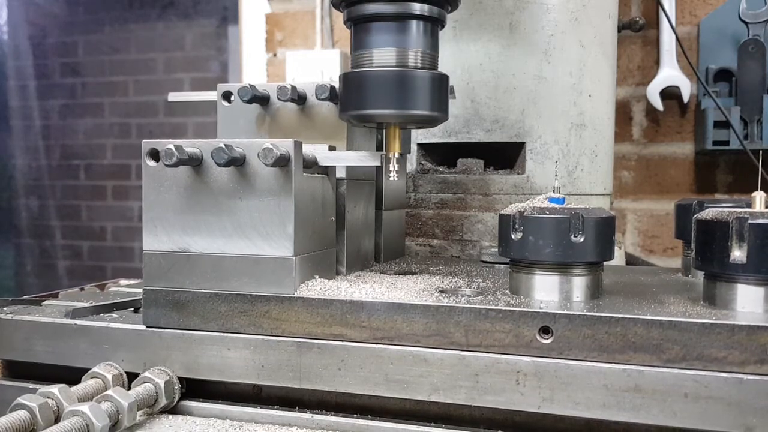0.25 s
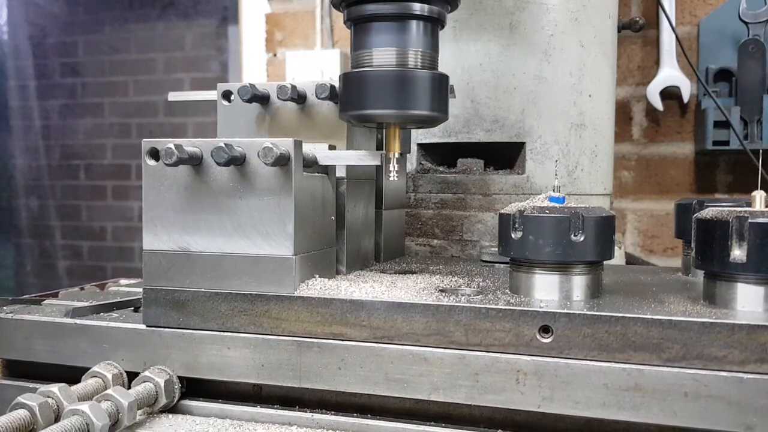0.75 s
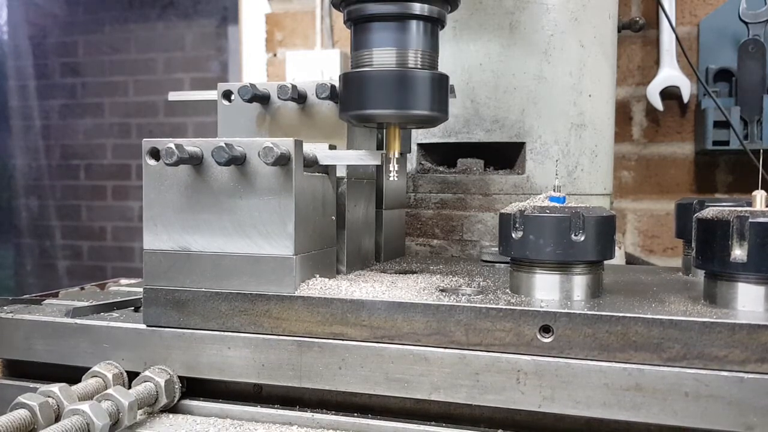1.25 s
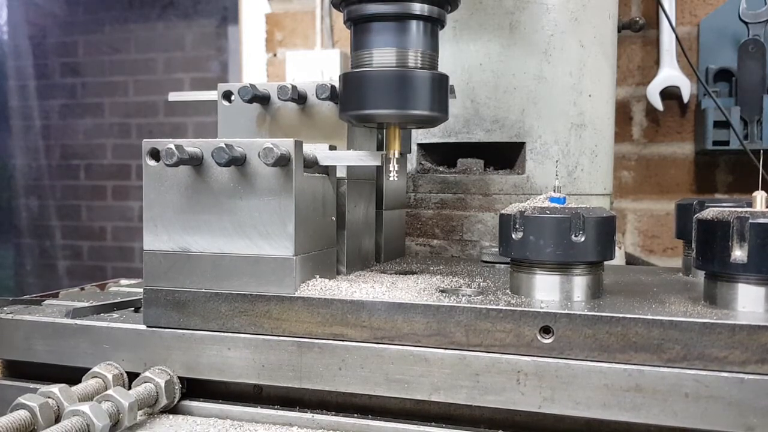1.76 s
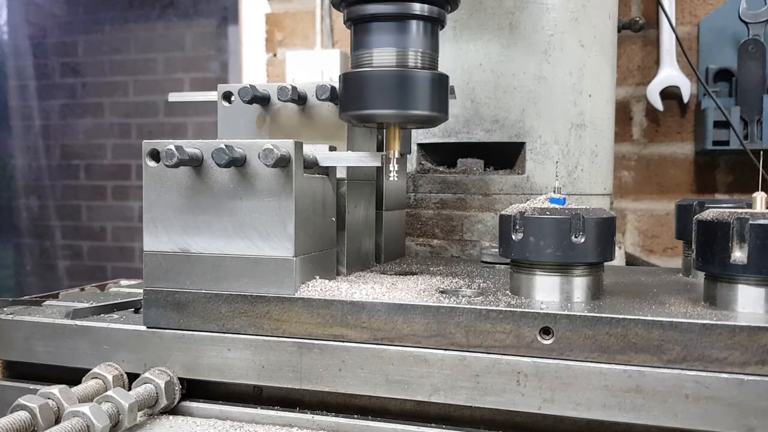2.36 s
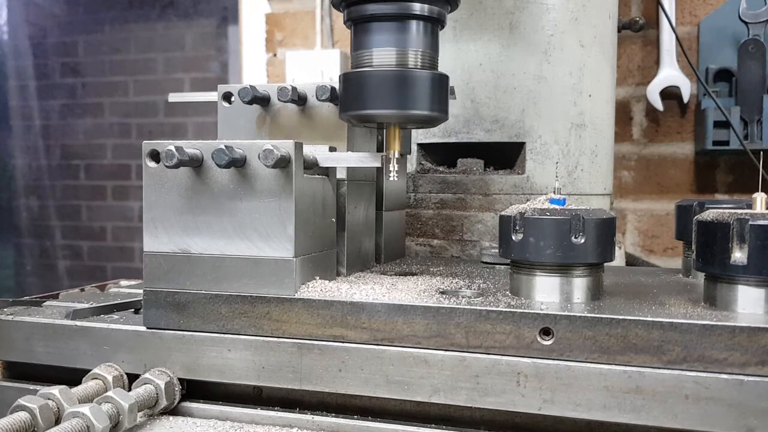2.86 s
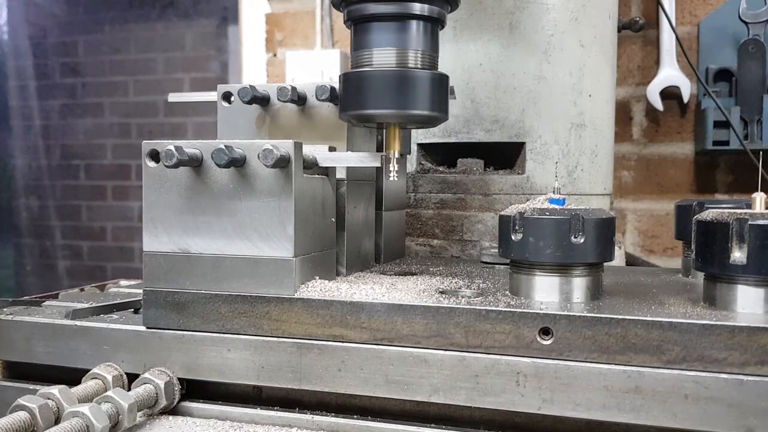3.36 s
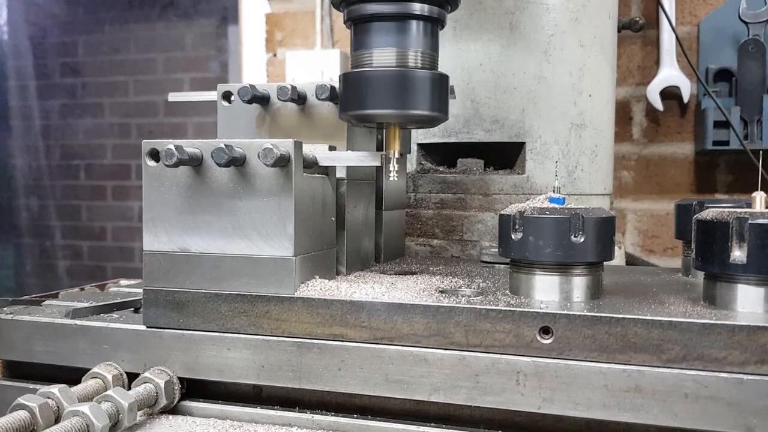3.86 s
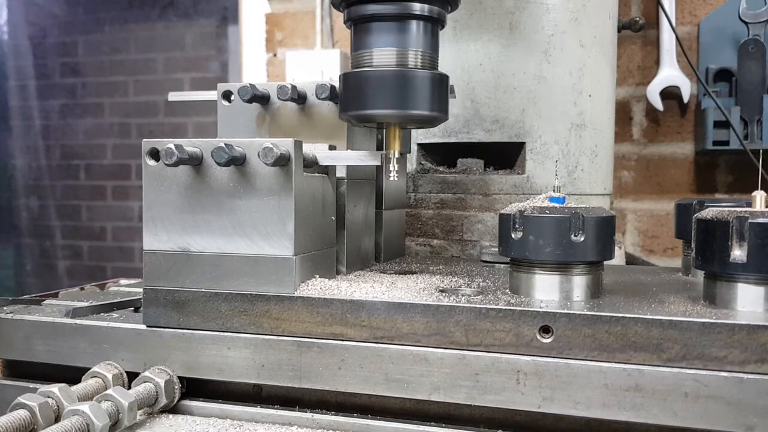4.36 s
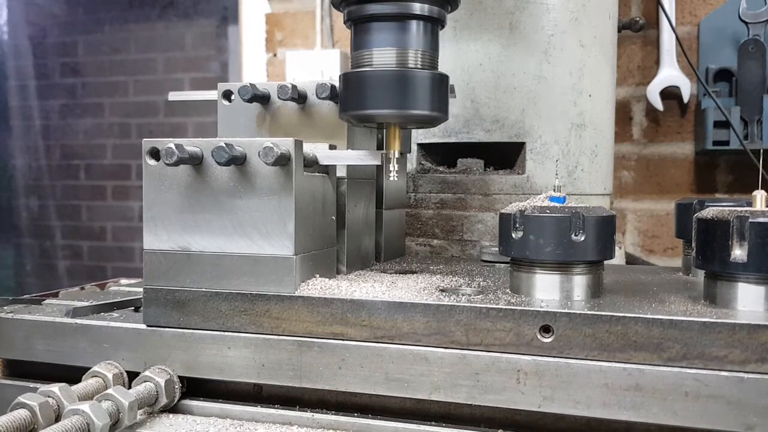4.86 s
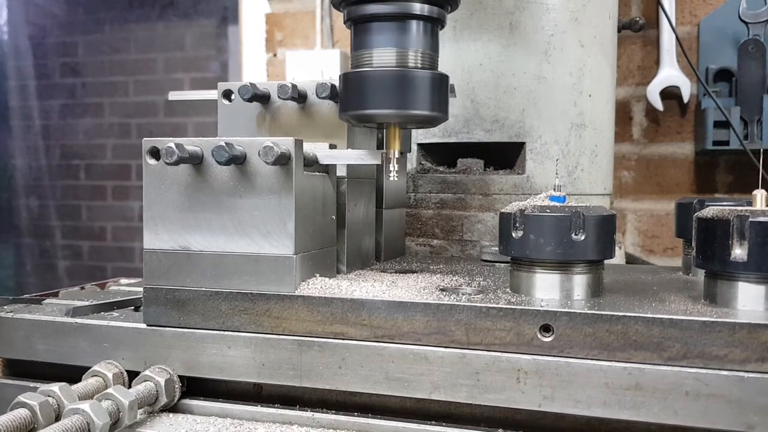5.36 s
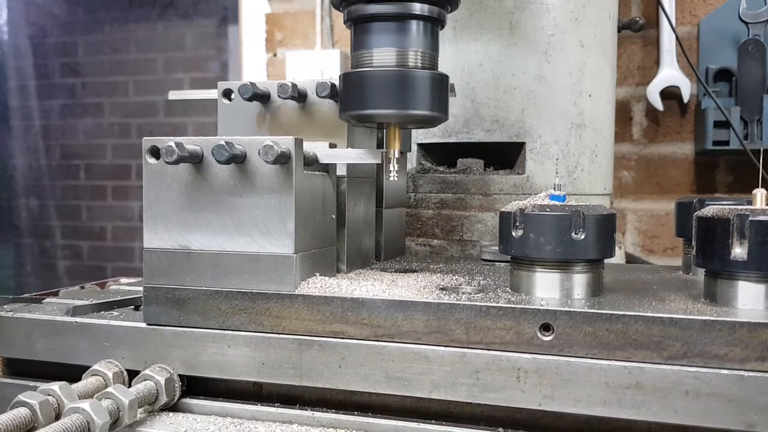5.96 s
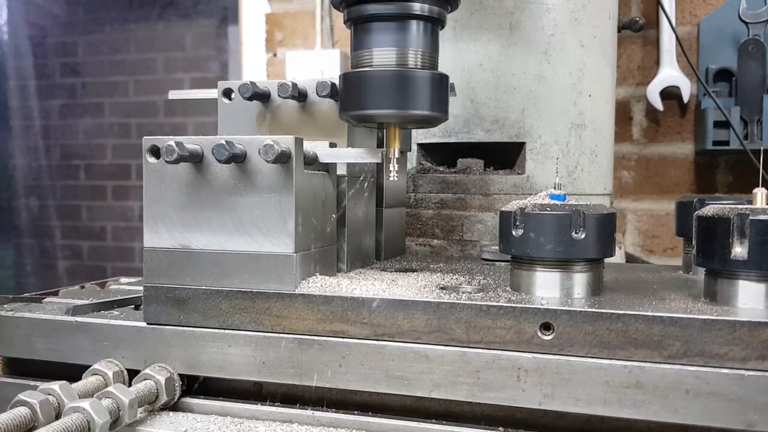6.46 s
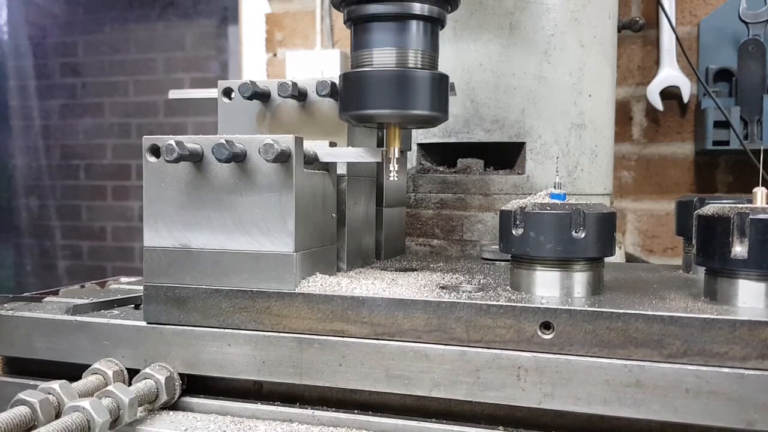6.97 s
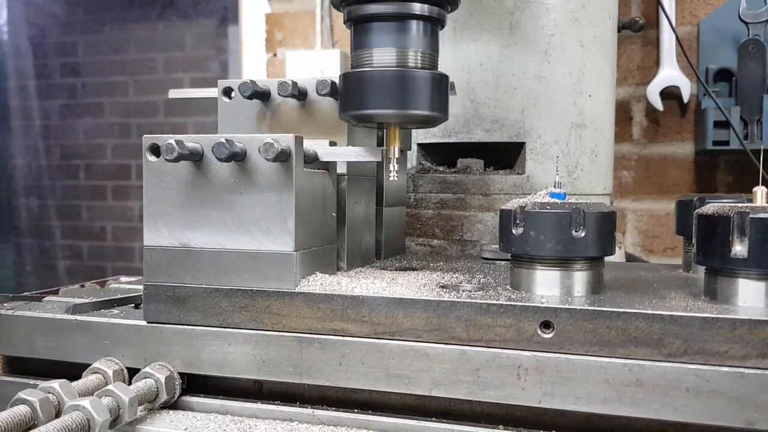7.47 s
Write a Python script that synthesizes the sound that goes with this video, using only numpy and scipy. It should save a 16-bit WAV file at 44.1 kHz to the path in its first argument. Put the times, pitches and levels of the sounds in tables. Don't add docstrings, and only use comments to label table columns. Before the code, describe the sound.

Constant low motor and gear drone with airy fan hiss, broken by two passes of shrill metal squeal, scratchy chip hiss and brief rattling chatter.

```python
import sys
import numpy as np
from scipy import signal
from scipy.fft import rfft, irfft, next_fast_len
from scipy.io import wavfile
from scipy.ndimage import uniform_filter1d, map_coordinates

SR = 44100
rng = np.random.default_rng(int(sys.argv[2]) if len(sys.argv) > 2 else 0)


def wav_out(sig):
    wavfile.write(sys.argv[1], SR, np.round(np.clip(np.atleast_2d(sig).T, -1, 1) * 32767).astype(np.int16))


def convert_level_to_amplitude(level_db):
    exponent = np.asarray(level_db, float) / 20
    return 10 ** exponent


N = 340442
T = np.arange(N) / SR

SHAFT_HZ, BELT_HZ, SPINDLE_HZ = 12.4138, 5.4382, 28.4
# order, level_db, left_right_db, left_lead_rad
SHAFT_ORDERS = [(5, -59.0, 2.0, -0.0), (6, -58.0, 2.0, -0.0), (7, -61.0, 0.0, -0.2), (8, -50.0, -4.0, 0.2),
                (11, -65.0, -7.0, 0.6), (14, -59.0, 5.0, 0.1), (16, -61.0, 1.0, 0.0), (18, -37.0, 3.0, 0.0),
                (19, -51.0, 3.0, 0.1), (20, -41.0, 2.0, -0.1), (21, -51.0, 2.0, 0.2), (22, -44.0, 1.0, 0.0),
                (23, -59.0, 2.0, 0.1), (24, -48.0, 3.0, -0.1), (25, -62.0, 2.0, -0.2),
                (27, -61.0, 3.0, 0.2), (28, -60.0, 3.0, -0.0), (29, -62.0, 1.0, 0.2), (32, -59.0, 0.0, 0.2),
                (33, -62.0, 3.0, 0.5), (38, -52.0, 3.0, 0.2), (46, -54.0, 2.0, -0.7), (51, -62.0, 5.0, 0.4),
                (53, -61.0, 5.0, -0.0)]
# order, level_db, left_right_db, left_lead_rad
GEAR_ORDERS = [(79, -68.0, 1.0, 0.5), (97, -58.0, 0.0, -0.7), (101, -55.0, 5.0, 0.0),
               (103, -56.0, -1.0, 0.7), (104, -58.0, 1.0, 1.3), (106, -56.0, -1.0, -0.8),
               (108, -57.0, -5.0, -1.2), (109, -54.0, -6.0, -0.1), (110, -56.0, -1.0, -0.2),
               (111, -53.0, -2.0, 1.2), (112, -52.0, 0.0, -0.6), (113, -52.0, -7.0, 2.8),
               (114, -44.0, 19.0, 2.2), (116, -43.0, 1.0, -0.9), (120, -61.0, -2.0, -2.1),
               (121, -61.0, -2.0, 2.1), (126, -64.0, -5.0, 1.0), (129, -60.0, -5.0, 1.9),
               (141, -64.0, -3.0, 1.0), (175, -55.0, 15.0, 2.3), (184, -61.0, 7.0, 2.7),
               (195, -63.0, 1.0, 1.9), (198, -65.0, 2.0, 1.0), (206, -64.0, 0.0, 1.1),
               (212, -59.0, 2.0, -0.0), (215, -59.0, -4.0, -0.9), (223, -56.0, 8.0, 0.6),
               (224, -61.0, 5.0, 0.2), (227, -65.0, 4.0, 0.1), (236, -65.0, -1.0, 1.6)]
# order, level_db, left_right_db, left_lead_rad
BELT_ORDERS = [(8, -70.0, 0.0, 0.3), (11, -65.0, 2.0, -0.0), (12, -60.0, 3.0, -0.0), (13, -55.0, 2.0, 0.0),
               (15, -63.0, 3.0, -0.0), (17, -63.0, -1.0, -0.0), (20, -64.0, -2.0, -0.1),
               (26, -62.0, 3.0, 0.3), (27, -63.0, 2.0, 0.2), (28, -52.0, 2.0, 0.0), (29, -60.0, 2.0, 0.1),
               (30, -58.0, 1.0, -0.2), (31, -61.0, 1.0, 0.1), (34, -60.0, 1.0, 0.1), (38, -54.0, 3.0, -0.1),
               (39, -49.0, 3.0, -0.0), (40, -50.0, 3.0, -0.1), (42, -44.0, 3.0, 0.0),
               (59, -58.0, 2.0, -0.1), (61, -55.0, 4.0, -0.1), (63, -61.0, 3.0, -0.0),
               (84, -58.0, 5.0, -0.5), (106, -55.0, 10.0, -0.9), (109, -62.0, 0.0, 0.0)]
# line_hz, level_db, left_right_db, left_lead_rad
INVERTER_LINES = [(5846.0, -67.0, -3.0, -2.3), (5963.4, -63.0, -7.0, 0.5), (5994.6, -51.0, 6.0, 1.2),
                  (6026.1, -61.0, -12.0, 1.4), (6041.0, -63.0, -8.0, -2.6), (6143.7, -64.0, 0.0, -1.4),
                  (7507.5, -65.0, 11.0, 0.4), (8945.3, -70.0, -7.0, -1.0), (11782.5, -75.0, 5.0, 1.7),
                  (11896.1, -74.0, 9.0, 2.9), (11958.3, -58.0, 1.0, -0.4), (11974.7, -67.0, 9.0, -2.1),
                  (11989.7, -64.0, 5.0, -0.2), (12020.6, -65.0, 3.0, 2.7), (12083.3, -68.0, 1.0, -2.9),
                  (12259.0, -73.0, 9.0, -2.6), (14940.3, -69.0, 2.0, 2.5), (14971.2, -71.0, 0.0, 0.2),
                  (15002.4, -70.0, -3.0, -1.4), (15014.6, -57.0, 21.0, -0.6), (15033.7, -63.0, -5.0, 2.0)]
# freq_hz, density_db_per_hz
RUMBLE = [(21, -53), (35, -26), (80, -15), (168, -13), (235, -8), (378, -11), (470, -11), (699, -15),
          (852, -9.5), (1040, -20), (1400, -10), (1740, -17.5), (2120, -12.5), (2440, -20.5), (4000, -23),
          (5200, -10), (8800, -120)]
# freq_hz, density_db_per_hz
FAN_HISS = [(1470, -36), (2500, -6.5), (2700, -6.5), (3570, -8), (3890, -10), (5270, -6), (6150, -8),
            (6300, -8.5), (7950, -16.5), (10600, -19.5), (11700, -14), (14100, -23.5), (15400, -13),
            (16000, -54)]
# freq_hz, width_hz, level_db
CASTING_MODES = [(225.6, 18, -49), (508, 73, -51), (892, 51, -57), (1244, 250, -46.5), (1607, 32, -52.5),
                 (2136, 23, -52), (3933, 130, -54.5)]
# freq_hz, level_db
BALL_TONES = [(155.7, -58), (657.6, -57), (717.5, -59), (781, -56), (829, -58), (842.5, -52), (871.4, -58),
              (1196.5, -57), (1617, -54), (1885, -61), (2024, -61), (2129, -55), (2153, -56), (2287, -57),
              (2555, -60), (2982, -61), (3013, -61), (3075, -61)]
# freq_hz, left_right_likeness
LIKENESS = [(60, 0.96), (130, 0.85), (290, 1), (640, 0.99), (1410, 0.14), (3100, 0.048), (6820, 0.026),
            (15000, 0.061)]
# freq_hz, left_right_db
NOISE_LEAN = [(60, 2), (130, 1.5), (290, -1), (640, 5.5), (1410, 1.5), (3100, 1), (6820, 0.5), (15000, 10)]
MACHINE_DB = 1.5

# start_s, level_db, rise_s, hold_s, fall_s
CHIP_SWELLS = [
    (1.2, -53, 0.37, 0.43, .1),
    (1.215, -45, .04, .05, .05),
    (1.285, -36, 0.03, 0.046, 0.14),
    (2.8, -58, .2, .03, .04),
    (5.0, -46.5, .06, 1.23, .1),
    (6.39, -36, 0.15, .11, 0.18),
    (6.5, -42.5, .1, 1.18, 0.11),
    (6.8, -42, .1, .02, .1),
]
RUB_HZ = 13110
# start_s, depth_db, attack_s, let_go_s, release_s
GAIN_DUCKS = [
    (1.24, 5, 0.64, 4.04, 0.62),
    (6.88, 3, 0.037, 8, .6),
]

# time_s, pitch_hz
SQUEAL_PITCH = [(1.25, 4590), (1.38, 4578), (1.56, 4596), (1.685, 4610), (1.705, 4598), (1.76, 4592),
                (1.79, 4580), (1.92, 4566), (2.0, 4580), (4.97, 4591), (5.3, 4597), (6.37, 4597),
                (6.43, 4606), (6.55, 4584), (6.64, 4591), (6.84, 4585), (6.95, 4592), (7.72, 4593)]
# start_s, level_db, rise_s, hold_s, fall_s
UPPER_SWELLS = [(1.252, -40, .01, .01, .02), (1.29, -36, .03, .02, .02), (1.335, -29, .03, .08, .3),
                (1.54, -25, .13, .08, .15), (1.64, -27, .05, .058, .02), (1.72, -31, .02, .04, .05),
                (1.79, -30, .05, .005, .12), (1.92, -43, .1, .05, .15), (5.0, -41, .04, .09, .1),
                (5.1, -38, .06, .45, .04), (5.6, -47, .04, .77, .1), (6.41, -36.5, .03, .15, .2),
                (6.64, -35.5, .15, .06, .03), (6.72, -44, .02, .02, .04), (6.79, -37.5, .025, .04, .1),
                (6.9, -44, .05, .11, .05), (7.0, -48, .1, .25, 1.5)]
# start_s, level_db, rise_s, hold_s, fall_s
LOWER_SWELLS = [(1.31, -24.5, .025, .02, .2), (1.4, -36, .1, .1, .3), (1.71, -27, .015, .05, .14),
                (1.85, -33, .1, .02, .2), (2.05, -51, .1, .05, .12), (5.0, -39, .04, .02, .1),
                (5.025, -35.5, .04, .04, .55), (6.45, -40, .08, .2, .2), (6.68, -36, .15, .02, .1),
                (6.728, -34.5, .02, .02, .08), (6.78, -38.5, .03, .05, .1), (6.885, -22.5, .11, .065, .055),
                (7.0, -41, .05, .3, .1), (7.33, -37, .3, .27, .7)]
# time_s, gap_hz
LINE_GAP = [(4.9, 28.4), (4.91, 26.3), (5.22, 26.3), (5.24, 28.4), (5.6, 28.4), (6.0, 29), (6.42, 28.4),
            (6.5, 23), (6.7, 22.2), (6.72, 14), (6.77, 14), (6.785, 28), (6.95, 28.4)]
# time_s, level_db
SECOND_HARMONIC = [(1.28, -30), (1.3, -15), (1.42, -14), (1.56, -27), (1.61, -23), (1.68, -15), (1.7, -24),
                   (4, -23)]
# start_s, level_db, rise_s, hold_s, fall_s
TIP_SINGS_SWELLS = [
    (1.42, -51, .03, 0.11, .1),
    (1.62, -30.5, 0.18, 0.077, 0.32),
]
THIRD_DB = -24
SECOND_PASS_S = 4
LOWER_LAG_TURNS = (.47, .8)

# start_s, level_db, rise_s, hold_s, fall_s
CHATTER_SWELLS = [
    (1.702, -20, 0.012, 0.16, 0.22),
    (2.07, -34, 0.11, 0.064, 0.13),
    (2.2, -44, .1, 0.21, .06),
]
# time_s, peak_db, ring_hz, half_length_s
EDGE_BITES = [
    (1.305, -11, 13700, 0.0022),
    (1.313, -21, 13600, .002),
    (1.691, -15, 13550, .0025),
    (1.989, -19, 13450, .002),
]
# time_s, peak_db
SHANK_RAPS = [(1.8223, -24), (1.8652, -27), (1.9155, -23), (1.951, -35), (1.9684, -26), (1.9869, -22),
              (2.0602, -28), (2.0697, -23), (2.1306, -27), (2.1695, -36), (2.2867, -34), (2.3221, -36),
              (2.4009, -37)]
# time_s, peak_db
CHIP_SNAGS = [
    (1.9165, -15),
    (2.0283, -26),
    (2.0567, -23),
    (2.0862, -27),
    (2.0981, -25),
    (2.2029, -34),
    (2.2777, -34),
    (2.3087, -30),
    (2.368, -34),
]
RAP_HALF_S, SNAG_HALF_S, RAP_DB, SNAG_DB = 0.0038, .003, -3.5, -1
TIP_HZ, TIP_SAG_HZ_PER_S = 13590, 400
RATTLE_HZ, RATTLE_SAG_HZ_PER_S = 4520, 160
RATTLE_DB, RATTLE_GROWS = -20.5, 0.6
SHANK_LOW_HZ, SHANK_LOW_DB = 4280, -7
DIG_S, DIG_DB, DIG_HALF_S = 1.303, -33, .002

# tip_level_db, from_hz, to_hz
EMPTIED_BANDS = [
    (-34, 15250, 16500),
    (-29, 14450, 15250),
    (-28.5, 10300, 11700),
    (-24.5, 9700, 12300),
]


def unit(x):
    return x / np.sqrt(np.mean(np.abs(x) ** 2) + 1e-20)


def along(points, hz):
    f, v = np.transpose(points)
    return np.interp(np.log(hz + 1), np.log(f + 1), v)


def wobble(rate_hz):
    return map_coordinates(rng.standard_normal(int(N * rate_hz / SR) + 4), [T * rate_hz])


def swells(rows):
    def under(start_s, rise_s, hold_s, fall_s):
        before = (start_s - T) / abs(rise_s)
        after = (T - start_s - hold_s) / abs(fall_s)
        return np.maximum(np.maximum(before, after), 0)

    power = sum(convert_level_to_amplitude(db - 20 * np.minimum(under(s, *shape), 10)) ** 2 for s, db, *shape in rows)
    return np.sqrt(power)


def filtered(x, response):
    m = next_fast_len(N + 8192)
    return irfft(rfft(x, m) * response(np.fft.rfftfreq(m, 1 / SR)), m)[..., :N]


def ears(pan_db, lead_rad):
    side = np.array([.5, -.5])[:, None]
    level = convert_level_to_amplitude(side * pan_db) / np.sqrt(np.cosh(pan_db * np.log(10) / 20))
    return level * np.exp(1j * side * lead_rad)


def turning(orders, turns, angle, scatter, bend=0, size=16384):
    k, db, pan_db, lead_rad = np.transpose(orders)
    phase = -2 * np.pi * k * angle + scatter * rng.standard_normal(len(k))
    phase = phase + 2 * np.pi * bend * (k - k[np.argmax(db)]) ** 2
    phase = phase - np.angle(ears(pan_db, lead_rad).sum(0))
    lines = np.zeros((2, size // 2 + 1), complex)
    lines[:, np.round(k).astype(int)] = convert_level_to_amplitude(db) * np.exp(1j * phase) * ears(pan_db, lead_rad)
    table = irfft(lines, size) * size / np.sqrt(2)
    return np.array([np.interp(turns % 1 * size, np.arange(size), side, period=size) for side in table])


def rush(gain):
    def mid_side(hz):
        turn = np.arccos(np.clip(along(LIKENESS, hz), 0, 1)) / 2
        return gain(hz) * [np.cos(turn), np.sin(turn)]

    mid, side = filtered(rng.standard_normal((2, N)), mid_side)
    lean = lambda hz: convert_level_to_amplitude(np.outer([.5, -.5], along(NOISE_LEAN, hz)))
    return unit(filtered(np.array([mid + side, mid - side]), lean))


def narrow(hz, width_hz, lump_db):
    base = filtered(rng.standard_normal((2, N)), lambda f: 1 / (1 + (2 * f / width_hz) ** 4))
    lumps = convert_level_to_amplitude(lump_db * wobble(140))
    carrier = np.exp(2j * np.pi * np.cumsum(hz) / SR)
    return unit(lumps * (base[0] + 1j * base[1])) * np.sqrt(2) * carrier


def drive():
    shaft = SHAFT_HZ * T + .0016 * wobble(2.5) + .0002 * wobble(14)
    hum = turning(SHAFT_ORDERS, shaft, angle=.86, scatter=.15, bend=.054)

    beat = 18 * (shaft - .36) - (18 * SHAFT_HZ - 41 * BELT_HZ) * (T - .28)
    partner = -convert_level_to_amplitude(-41.5 + np.array([[4.5], [1.5]])) * np.cos(2 * np.pi * beat)

    mesh_scatter = np.where(abs(np.transpose(GEAR_ORDERS)[0] - 112) < 5, .15, 3)
    mesh = turning(GEAR_ORDERS, shaft, angle=.455, scatter=mesh_scatter)
    mesh = mesh * convert_level_to_amplitude(.7 * wobble(6) + .5)

    k = np.arange(30, 300)
    faint_db = along(RUMBLE, k * SHAFT_HZ) + rng.normal(-50.5, 3.1, len(k))
    strong = np.isin(k, np.transpose(SHAFT_ORDERS + GEAR_ORDERS)[0])
    faint_db = np.where(strong, -120, faint_db)
    faint = [k, faint_db, rng.normal(2.4, 4.0, len(k)), rng.normal(0, 1.84, len(k))]
    small = turning(np.transpose(faint), shaft, angle=0, scatter=3.6)

    belt = turning(BELT_ORDERS, BELT_HZ * T + 0.00029 * wobble(2.58), angle=0, scatter=5.09)
    return hum + partner + mesh + small + belt


def inverter():
    span_s = N / SR
    cycles = np.multiply(INVERTER_LINES, [span_s, 1, 1, 1])
    return turning(cycles, T / span_s, angle=0, scatter=3.53, size=N)


def bearings():
    body = convert_level_to_amplitude(-38) * rush(lambda hz: convert_level_to_amplitude(along(RUMBLE, hz)) * (hz < 4600))
    air = convert_level_to_amplitude(-42.0 + 0.96 * wobble(16)) * rush(lambda hz: convert_level_to_amplitude(along(FAN_HISS, hz)))

    def casting(f):
        return sum(convert_level_to_amplitude(db) * np.sqrt(100 / w) / (1 + (2 * (f - hz) / w) ** 2) for hz, w, db in CASTING_MODES)

    def head_modes(f):
        return 1 / (1 + (2 * (f - 2740) / 240) ** 2) + .45 / (1 + (2 * (f - 3930) / 200) ** 2)

    knock = unit(np.exp(2.5 * np.cos(2 * np.pi * (SHAFT_HZ * T - .62))))
    head = convert_level_to_amplitude(-47) * knock * rush(head_modes)
    air = air * (1 + .03 * knock)
    return body + air + head + convert_level_to_amplitude(-41.5) * rush(casting)


def balls():
    out = 0
    for hz, db in BALL_TONES:
        level = convert_level_to_amplitude(db + 1.5 + 1.5 * wobble(4))
        tone = level * np.exp(2j * np.pi * hz * T + 1j * hz / 1800 * wobble(5))
        out = out + tone * ears(rng.normal(2, 3), rng.normal(0, hz / 2000))
    return out.real


def chips():
    hz = np.full(N, RUB_HZ)
    throb = 1 + .3 * np.cos(2 * np.pi * (SPINDLE_HZ * T + .1 * wobble(3)))
    tip = narrow(hz, width_hz=320, lump_db=1.5) * ears(5.4, -1.2)
    tip = tip + 0.91 * narrow(hz + 350, width_hz=870, lump_db=0.0) * ears(4.5, -.6)
    spray = convert_level_to_amplitude(-5.5) * rush(lambda f: f / (f + 6000))
    graze = 1 + .8 * np.cos(2 * np.pi * SPINDLE_HZ * (T - 1.286))
    throb = throb * np.where(T < 1.3, graze, 1)
    return swells(CHIP_SWELLS) * throb * (tip.real + spray)


def shop(x, t60_s=0.18):
    t = np.arange(SR // 2) / SR
    tail = rng.standard_normal((2, len(t))) * convert_level_to_amplitude(-60 * t / t60_s) * (t > .004)
    return signal.fftconvolve(x, tail / np.linalg.norm(tail[0]), axes=1)[:, :N]


def camera_gain():
    ramp = lambda start_s, length_s: np.clip((T - start_s) / length_s, 0, 1)
    duck_db = sum(db * (ramp(s, attack) - ramp(free, release)) for s, db, attack, free, release in GAIN_DUCKS)
    return convert_level_to_amplitude(MACHINE_DB - duck_db)


def squeal():
    per_pass = lambda pair: np.where(T < SECOND_PASS_S, *pair)
    hz = np.interp(T, *np.transpose(SQUEAL_PITCH))
    high, low = swells(UPPER_SWELLS), swells(LOWER_SWELLS)
    both = np.hypot(high, low)

    upper = high * convert_level_to_amplitude(wobble(30)) * np.exp(2j * np.pi * np.cumsum(hz) / SR)
    lower_hz = hz - np.interp(T, *np.transpose(LINE_GAP))
    turns = np.cumsum(lower_hz) / SR - per_pass(LOWER_LAG_TURNS)
    lower = low * convert_level_to_amplitude(wobble(30)) * np.exp(2j * np.pi * turns)

    blur = np.sqrt(2) * np.exp(.08j * wobble(60))
    friction = np.minimum(.2, .0022 / both)
    blur = blur * (1 + friction * narrow(np.zeros(N), width_hz=300, lump_db=2))
    swing = blur * (upper + lower)
    cycle = np.exp(1j * np.angle(swing))
    beat = np.abs(swing) / both

    out = convert_level_to_amplitude(4.3) * blur * (upper * ears(2, 1.9) + lower * ears(per_pass((13.5, 17)), 2.7))
    above = np.minimum(high, low) * per_pass((0, .4)) * (T < 6.72)
    above = above * np.exp(1j * (2 * np.angle(upper) - np.angle(lower)))
    out = out + convert_level_to_amplitude(4.3) * above * ears(6, 1.1)

    second = convert_level_to_amplitude(np.interp(T, *np.transpose(SECOND_HARMONIC)))
    out = out + second * swing * cycle * ears(11.0, 2.6)
    sings = swells(TIP_SINGS_SWELLS)
    frayed = 1 + .17 * narrow(np.zeros(N), width_hz=350, lump_db=2.5)
    out = out + beat * (convert_level_to_amplitude(THIRD_DB) * both + sings) * cycle ** 3 * frayed * ears(7.9, -.9)
    out = out + convert_level_to_amplitude(-10) * sings * narrow(3 * hz - 100, width_hz=900, lump_db=4.0) * ears(5, -1.1)

    scrape = convert_level_to_amplitude(-25) * np.minimum(both, .03) * narrow(hz - 110, width_hz=500, lump_db=1.5) * ears(3.1, .3)
    return (out + scrape).real


def chatter():
    start_s = CHATTER_SWELLS[0][0]
    size, since = swells(CHATTER_SWELLS), np.clip(T - start_s, 0, 1)

    hz = TIP_HZ - TIP_SAG_HZ_PER_S * since + 40 * wobble(30)
    locked = np.clip(1 - since / .4, 0, 1) * .75
    rough = narrow(hz, width_hz=330, lump_db=3.0)
    held = rough / np.sqrt(np.abs(rough) ** 2 + .3) * 1.7
    tip = (locked * held + (1 - locked) * rough) * ears(4.5, -1.1)
    tip = tip + (.2 + since) * narrow(hz - 300, width_hz=700, lump_db=4) * ears(4.5, -1.0)
    middle = narrow(hz * 2 / 3, width_hz=380, lump_db=2.5) * ears(10, 1.5)

    shank = narrow(RATTLE_HZ - RATTLE_SAG_HZ_PER_S * since, width_hz=240, lump_db=3) * ears(9.1, 0.95)
    soft = narrow(SHANK_LOW_HZ - 60 * since, width_hz=170, lump_db=2.5) * ears(5, .6)
    shank = shank + convert_level_to_amplitude(SHANK_LOW_DB) * soft
    shank = shank * np.clip(since / .09, 0, 1)
    out = size * (tip + convert_level_to_amplitude(-23.5) * middle) + convert_level_to_amplitude(RATTLE_DB) * size ** RATTLE_GROWS * shank

    dig = np.exp(-((T - DIG_S) / DIG_HALF_S) ** 2)
    out = out + convert_level_to_amplitude(DIG_DB) * dig * rush(lambda f: f / (f + 3000))

    tip_hz = lambda s: TIP_HZ - TIP_SAG_HZ_PER_S * (s - start_s)
    rattle_hz = lambda s: RATTLE_HZ - RATTLE_SAG_HZ_PER_S * (s - start_s)
    rings = [(s, db, ring_hz, half_s, -1.1) for s, db, ring_hz, half_s in EDGE_BITES]
    rings += [(s, db + SNAG_DB, tip_hz(s), SNAG_HALF_S, -1.1) for s, db in CHIP_SNAGS]
    rings += [(s, db + RAP_DB, rattle_hz(s), RAP_HALF_S, .95) for s, db in SHANK_RAPS]
    for s, db, ring_hz, half_s, lead_rad in rings:
        at = slice(round((s - .01) * SR), round((s + .03) * SR))
        late = (T[at] - s) / half_s
        shape = np.exp(-np.where(late < 0, 2 * late, late) ** 2)
        out[:, at] += convert_level_to_amplitude(db) * shape * np.exp(2j * np.pi * ring_hz * T[at]) * ears(5.0, lead_rad)
    return out.real


def scene():
    machine = camera_gain() * (drive() + inverter() + bearings() + balls())
    line, rough = squeal(), chips() + chatter()
    return machine + line + rough + shop(convert_level_to_amplitude(-27) * line + convert_level_to_amplitude(-16) * rough)


def roll_off(x):
    return signal.sosfilt(signal.butter(12, 16460, fs=SR, output="sos"), x)


def record(dry):
    kept = filtered(dry, lambda hz: np.clip((15890 - hz) / 120, 0, 1))
    tip = filtered(kept.mean(0), lambda hz: abs(hz - 13500) < 700)
    power = np.roll(uniform_filter1d(tip ** 2, size=4096), 1100)
    for over_db, lo_hz, hi_hz in EMPTIED_BANDS:
        emptied = uniform_filter1d(1. * (power > convert_level_to_amplitude(2 * over_db)), size=512)
        kept = kept - emptied * filtered(kept, lambda hz: (hz > lo_hz) & (hz < hi_hz))
    return roll_off(kept)


dry = scene()
out = record(dry)
wav_out(out)
```